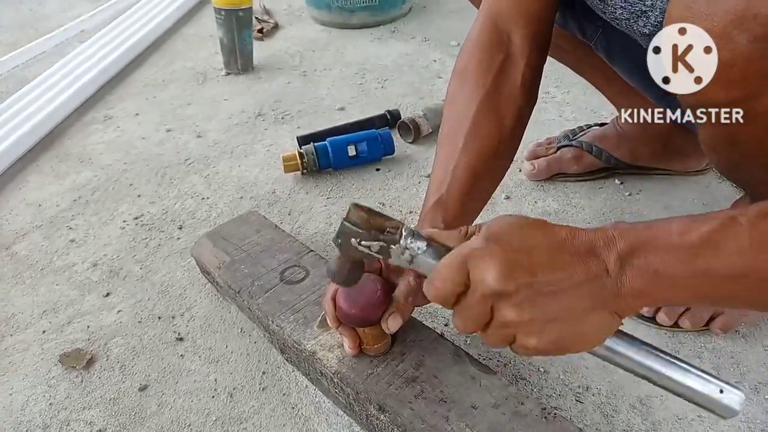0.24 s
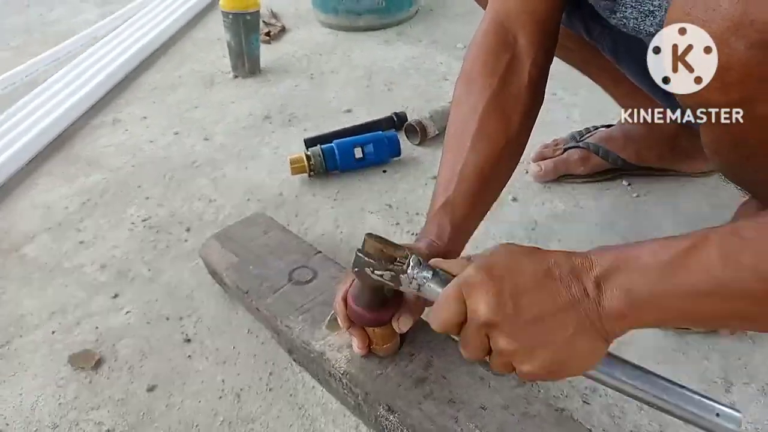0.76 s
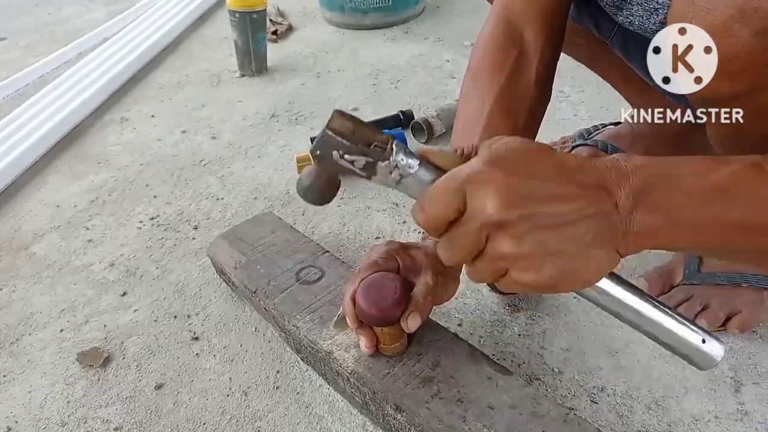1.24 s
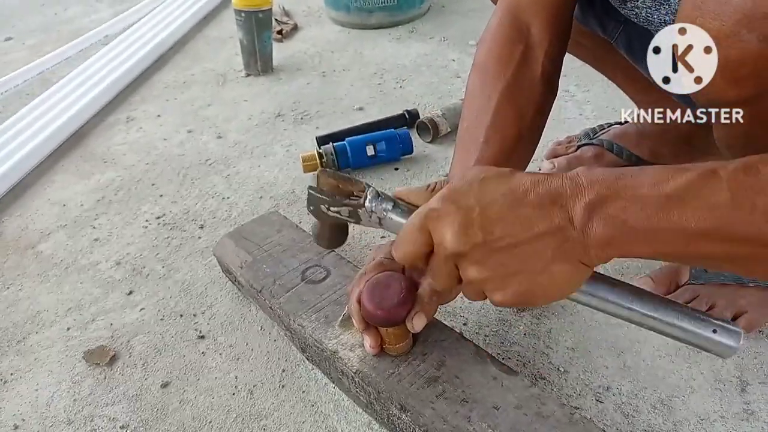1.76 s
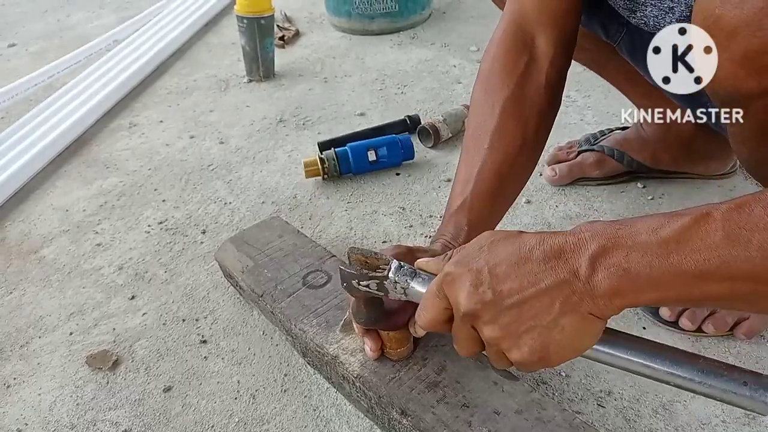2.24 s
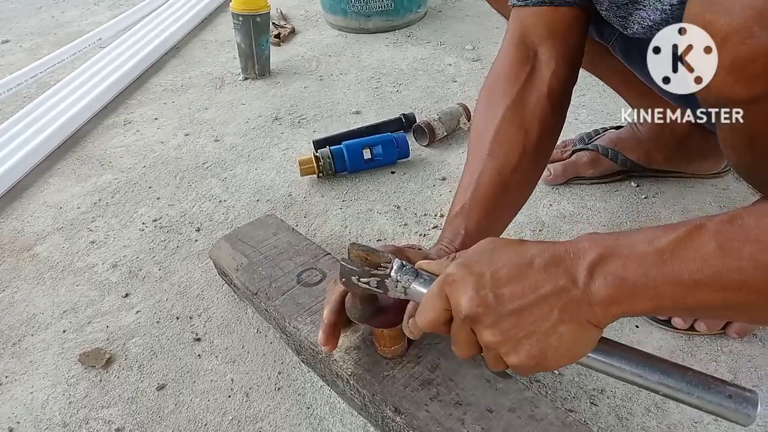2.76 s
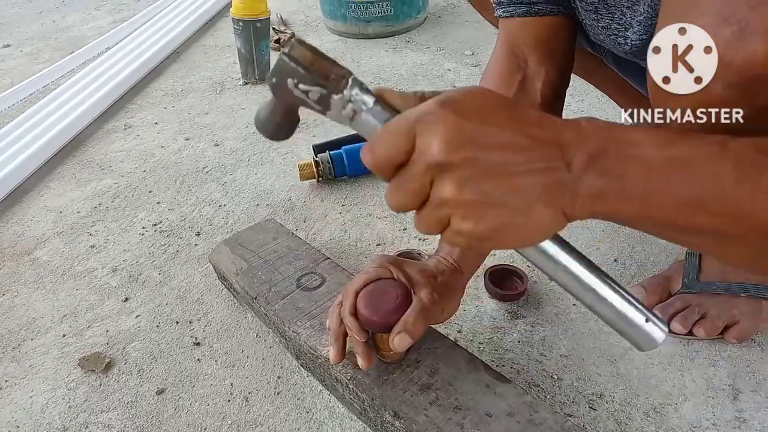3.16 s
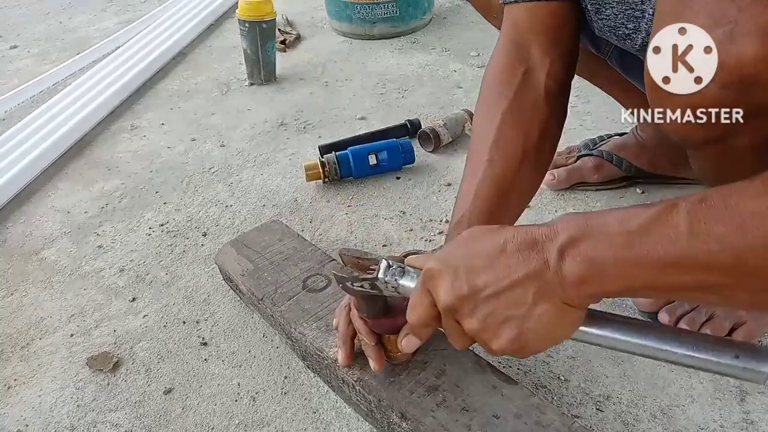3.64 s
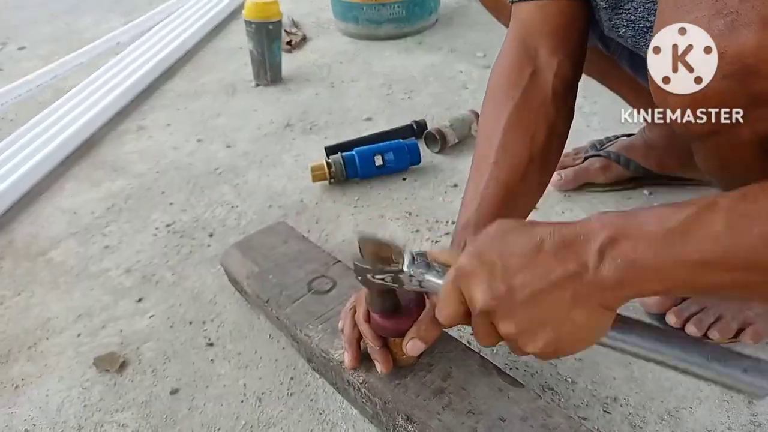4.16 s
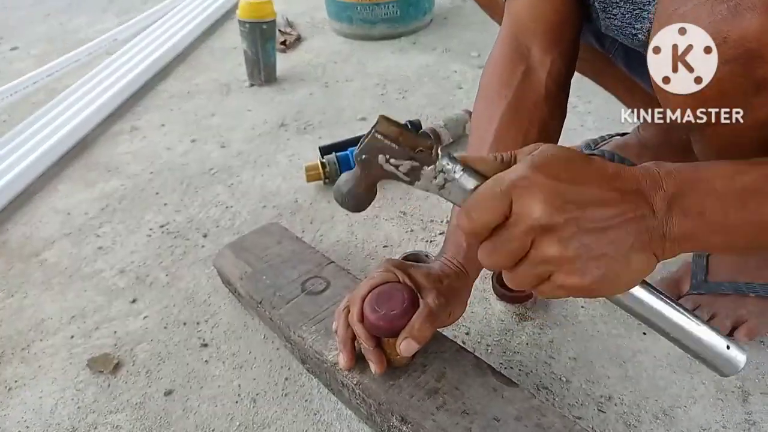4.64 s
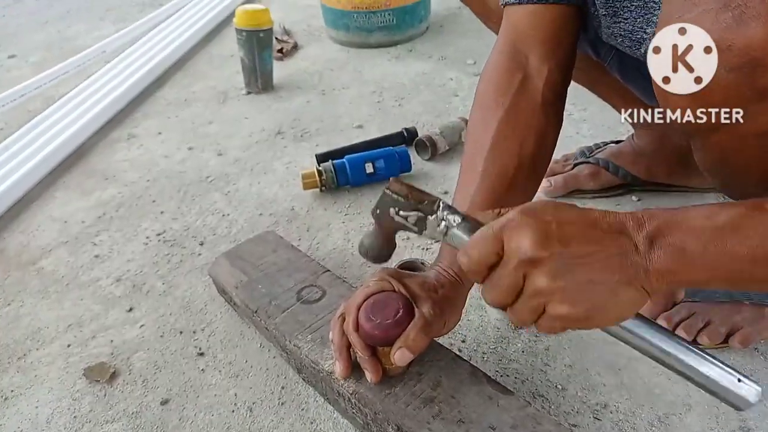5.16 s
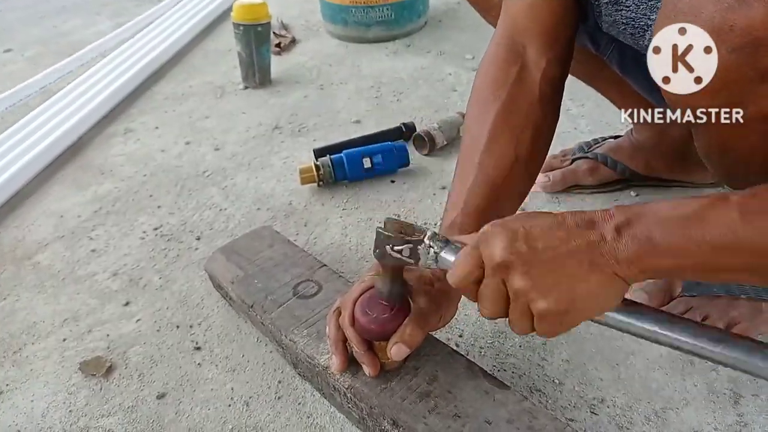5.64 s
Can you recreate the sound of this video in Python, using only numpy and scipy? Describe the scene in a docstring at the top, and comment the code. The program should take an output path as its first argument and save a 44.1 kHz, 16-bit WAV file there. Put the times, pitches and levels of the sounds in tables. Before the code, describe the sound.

A hammer hits a capped steel punch on a wooden block, about three sharp blows a second, each with a short metallic ring, a woody knock and a fluttering echo off yard walls. After eight blows it pauses, and metal clinks and jingles softly as the punch is turned. Nine more blows follow, varying in weight. The microphone is close and overloads slightly, over a faint outdoor rumble.

```python
"""Sharp hammer taps on a capped steel punch, driven through leather on a wooden block, ring in a hard yard.
Each impact excites the damped modes of steel and wood, and the walls reflect it as a fluttering echo.
Loose steel clinks between the blows, which pause while the fingers turn the punch; outdoor air rumbles.
The close microphone overloads on the blows, and the recorder's gain control ducks and swells back."""
import sys
import numpy as np
from scipy import signal
from scipy.fft import rfft, irfft, next_fast_len
from scipy.io import wavfile
from scipy.ndimage import uniform_filter1d, minimum_filter1d, map_coordinates

SR = 44100
rng = np.random.default_rng(int(sys.argv[2]) if len(sys.argv) > 2 else 0)


def store_wav(level_fs):
    """Save 16-bit WAV to argv[1]."""
    pcm = np.round(np.clip(np.atleast_2d(level_fs), -1, 1) * 32767)
    wavfile.write(sys.argv[1], SR, pcm.T.astype(np.int16))


N = 259749

# hammer blows: (time [s], weight carried through the punch into the block [dB])
BLOWS = [(0.0202, -12), (0.319, -9.5), (0.6302, -13), (0.921, -12.5), (1.226, -3), (1.5257, -3.5),
         (1.8255, -2.5), (2.1276, 0.5), (3.4494, 3), (3.772, -2.5), (4.0595, -3), (4.3447, -4), (4.628, -2),
         (4.9338, -13.5), (5.215, -13.5), (5.4853, -4), (5.7753, 0.5)]
# modes of hammer, cap and punch: (frequency [Hz], level [dB], nominal t60 [s])
PUNCH_MODES = [(832, -11, .03), (1066, -5, .032), (1270, -12, .022), (1480, -3, .025), (1660, -6, .027),
               (2110, 1, .029), (2290, -4, .027), (2550, -4, .024), (2850, -8, .02), (3150, -12, .018),
               (3660, -16, .02), (4800, -25, .015)]
# modes of the wooden block: (frequency [Hz], level [dB], t60 [s])
BLOCK_MODES = [(264.6, 1, 0.016), (431, 0, 0.012), (593, -5.5, 0.018)]
# reflections from the walls: (delay [s], level [dB])
WALL_ECHOES = [(.026, -16), (.041, -1), (.049, 0), (.069, -4), (.096, -1), (.116, -9), (.141, -9),
               (.15, -6), (.168, -16), (.193, -12), (.219, -20), (.24, -16)]
# reverberation time of the yard: (frequency [Hz], t60 [s])
YARD_T60 = [(200, .7), (1200, .8), (2600, .74), (5000, .5), (12000, .3)]
# modes of the loose steel: (frequency [Hz], level [dB], ring time [ratio])
STEEL_MODES = [(1480, 9, 1.03), (1940, 9, 0.47), (2494, 9.5, 0.76), (2705, 1, 1.21), (3030, -7.5, 1.17),
               (3534, -3, 0.75), (3887, -13, 1.94), (4753, -10, 1.77), (5460, -14, 0.84),
               (6320, -18.5, 2.1), (7700, -7, 1.3), (8020, -9.5, 1.84), (9400, -35, 0.67),
               (10430, -10, 0.85), (11470, -11, 1.4), (12100, -2, 0.94), (13760, -28, 1), (15100, -21, .8)]
# clear clinks: (time [s], level [dB], nominal t60 [s])
CLINKS = [(0.795, -14, 0.052), (1.035, -8.5, 0.052), (1.0524, -14, 0.042), (1.4892, -9.5, 0.02),
          (1.7265, -7, 0.024), (1.8787, -1.5, 0.026), (3.114, -19, 0.013), (3.4404, -11, 0.043),
          (3.628, -11, 0.04), (3.6731, -7.5, 0.054), (3.7675, -15, .04), (4.0545, -5, 0.038),
          (5.7387, -11.5, 0.058)]
# spells of jingling as the punch is shifted: (start [s], length [s], typical tick level [dB])
JINGLES = [(0.76, 0.14, -25), (1.36, 0.35, -26.5), (2.699, .48, -28.5)]
# the hammer resting on the cap: (time [s], level [dB], pitch [Hz], nominal t60 [s])
KNOCKS = [(2.609, -13.5, 2100, 0.029), (2.6657, -12, 3050, .031), (2.725, -2, 3950, 0.021),
          (2.811, -19, 1780, 0.023), (2.8414, -9, 3370, 0.039), (3.0073, -14.5, 2550, 0.041),
          (3.1617, -10.5, 2900, 0.067), (3.68, 4.5, 3420, 0.013)]
# rubs of hand, punch and leather: (start [s], length [s], level [dB])
RUBS = [(0.252, 0.043, -43.5), (0.734, 0.12, -43.5), (3.205, 0.25, -47.5), (3.678, 0.072, -43),
        (4.509, 0.051, -40)]
# noise spectra: (frequency [Hz], relative spectral density [dB])
CRACK_SPECTRUM = [(200, 2.5), (700, -8), (1100, 3.5), (2300, 5), (3200, 3.5), (4500, -18.5), (9000, -25),
                  (15000, -47)]  # hammer contact
YARD_SPECTRUM = [(150, -30), (300, -21), (620, -14.5), (790, 4), (1150, -7), (1350, 2.5), (1800, 1.5),
                 (2450, 3), (3200, -5), (4100, -15.5), (5400, -35.5), (8000, -30.5), (12000, -50)]  # early reflections and diffuse tail
FLUTTER_SPECTRUM = [(150, -52), (280, -14), (410, 1.5), (620, -14.5), (830, 1), (1350, 8), (1900, -3.5),
                    (2600, -15), (3600, -24.5), (5400, -46), (12000, -55)]  # wall echoes
GRIT_SPECTRUM = [(1500, -25), (3200, 9.5), (4000, 17.5), (4800, 9), (6200, -10.5), (8500, 13.5),
                 (11500, -2.5), (14000, 4), (16000, -1)]  # friction and small clicks
SHIFT_SPECTRUM = [(30, -28), (70, 2), (140, -4), (300, -30), (1000, -80)]  # the block shifting on the floor
AIR_SPECTRUM = [(25, -23), (45, -21), (75, 6), (140, 9.5), (230, 2), (400, 1.5), (700, 2.5), (1200, -1.5),
                (2800, -0.5), (4200, -12), (6000, -57), (9000, -71)]  # outdoor rumble
HISS_SPECTRUM = [(3000, 0), (6000, -10), (7000, -5), (8000, 7.5), (9200, -1.5), (10300, -10), (12000, -15),
                 (15500, -26)]  # thin background hiss


def hammer(contact_s=0.00085, grip_detune=0.022, grip_ring_share=0.83, bounce_s=0.0032):
    """Impact excitation: each blow rings the hand-damped punch, knocks the block and thumps the ground."""
    track, t = np.zeros(N), np.arange(SR // 8) / SR
    hz, mode_db, t60 = np.transpose(PUNCH_MODES)[:, :, None]
    wood = sum((-1) ** k * amp(db) * np.sin(2 * np.pi * f * t) * fade(t, life)
               for k, (f, db, life) in enumerate(BLOCK_MODES))
    # the thud sinks in pitch as the block settles
    sinking_hz = 60 + 70 * np.exp(-t / 0.012)
    thud = np.sin(2 * np.pi * np.cumsum(sinking_hz) / SR) * fade(t, 0.049)
    # struck on the same spot each time, the modes start alike
    start_phase = 2 * np.pi * rng.random(hz.shape)
    for s, weight_db in BLOWS:
        force_db, tilt_db_per_octave = strike(weight_db)
        level_db = mode_db + tilt_db_per_octave * np.log2(hz / 1600) + 2 * rng.standard_normal(hz.shape)
        gripped_hz = hz * (1 + grip_detune * rng.standard_normal(hz.shape))
        phase = 2 * np.pi * gripped_hz * t + start_phase + .5 * rng.standard_normal(hz.shape)
        ring = np.sum(amp(level_db) * np.sin(phase) * fade(t, grip_ring_share * t60, contact_s), axis=0)
        crack = noise(CRACK_SPECTRUM, len(t)) * fade(t, .028, contact_s)
        steel = amp(force_db) * (amp(8) * ring + crack)
        ground = amp(-9 + 1.8 * weight_db) * thud  # joins in only under heavy blows
        add(track, s, steel + amp(2 + weight_db) * wood - ground)
        # the concrete floor throws the crack straight back
        add(track, s + bounce_s, amp(force_db - 1) * noise(CRACK_SPECTRUM, len(t)) * fade(t, .02))
    return track


def strike(weight_db):
    """Contact force: a square, heavy blow is a little louder [dB] and duller [dB per octave]."""
    return -4 + 0.087 * weight_db, -2 - 0.04 * weight_db


def yard_echoes(recolour=0.053):
    """Multiple reflection: the walls return each blow as a slap, then flutter over a diffuse tail."""
    t = np.arange(SR) / SR
    hz, frame_s, bands = signal.stft(noise(YARD_SPECTRUM, SR), SR, nperseg=256)
    tail = signal.istft(bands * fade(frame_s, along(YARD_T60, hz)[:, None]), SR, nperseg=256)[1][:SR]
    response = amp(-18) * noise(YARD_SPECTRUM, SR) * fade(t - .008, .4, .004)  # weak near reflections
    # the nearest large wall returns a bright slap, and the tail follows it
    slap = amp(1) * noise(YARD_SPECTRUM, SR) * fade(t, .07, .001)
    add(response, .0422, slap + amp(-7) * tail)
    # rough walls smear and dull the later echoes
    flutter = np.sqrt(sum((amp(db) * fade(t - delay, .045, .003)) ** 2 for delay, db in WALL_ECHOES))
    response += amp(3) * flutter * noise(FLUTTER_SPECTRUM, SR)
    track = np.zeros(N)
    for s, weight_db in BLOWS:
        force_db, tilt_db_per_octave = strike(weight_db)
        # every contact has a slightly different shape, which recolours the echo
        contact = recolour * rng.standard_normal(256) * fade(t[:256], .03)
        contact[0] = 1
        tilt = lambda f: amp(.5 * tilt_db_per_octave * np.log2(np.clip(f, 700, 3000) / 1600))
        add(track, s, amp(force_db - 4.5) * filtered(signal.fftconvolve(response, contact), tilt))
    return track


def clinks(pitch_hz=4000, rattles_per_s=4, rattle_t60=0.063, jingles_per_s=22, jingle_t60=0.076):
    """Light collisions: loose steel clinks, jingles as the punch shifts and rattles as the hands move."""
    events = [(s, db, pitch_hz, t60) for s, db, t60 in CLINKS]
    spells = [(0.0021, N / SR, -32.5, rattles_per_s, rattle_t60)]  # faint rattling throughout
    spells += [(*spell, jingles_per_s, jingle_t60) for spell in JINGLES]
    for s, length, db, rate, t60 in spells:
        for _ in range(round(rate * length)):
            events.append((s + length * rng.random(), rng.normal(db, 0.5), pitch_hz, t60))
    return amp(1) * small_steel(events, width_octaves=0.81, click_db=-7, attack_s=0.001)


def knocks():
    """Soft contact: the hammer head settles on the cap and excites a narrow band of modes."""
    return amp(-3) * small_steel(KNOCKS, width_octaves=0.35, click_db=-5.5, attack_s=0.0017)


def small_steel(events, width_octaves, click_db, attack_s):
    """Resonance: a light contact rings the steel modes nearest its own pitch, over a short click."""
    track, t = np.zeros(N), np.arange(SR // 4) / SR
    hz, mode_db, ring_time = np.transpose(STEEL_MODES)[:, :, None]
    for s, db, pitch_hz, t60 in events:
        focus = lambda f: 1 / (1 + (np.log2((f + 1) / pitch_hz) / width_octaves) ** 2)
        # the shifting grip changes each mode's strength, tuning and damping
        strength_db, detune, damping = rng.normal(0, [3.5, .012, .3], (len(hz), 3)).T[:, :, None]
        gains = amp(mode_db + strength_db) * focus(hz)
        phase = 2 * np.pi * (hz * t * (1 + detune) + rng.random(hz.shape))
        decay = fade(t, t60 * ring_time * np.exp(-damping), attack_s)
        ring = np.sum(gains * np.sin(phase) * decay, axis=0) / np.linalg.norm(gains)
        click = unit(filtered(noise(GRIT_SPECTRUM, len(t)), focus)) * fade(t, .025, attack_s)
        add(track, s, amp(db) * (ring + amp(click_db) * click))
    return track


def rubs(slips_per_s=350, turn_start_s=2.4, turn_length_s=0.91):
    """Stick-slip friction: grit under the hand rings the steel faintly, and the shifting block rumbles."""
    strokes, t = np.zeros(N), np.arange(SR // 12) / SR
    turn = (turn_start_s, turn_length_s, -63.5)  # the fingers rustle as they turn the punch
    for s, length, db in RUBS + [turn]:
        add(strokes, s, amp(db) * signal.windows.tukey(int(length * SR), .5))
    slips = (rng.random(N) < slips_per_s / SR) * rng.standard_normal(N)
    ring = np.zeros(len(t))
    for hz, _, ring_time in STEEL_MODES:
        mode = np.sin(2 * np.pi * (hz * t + rng.random())) * fade(t, 0.015 * ring_time)
        ring += amp(along(GRIT_SPECTRUM, hz)) * mode
    grit = unit(signal.fftconvolve(slips, ring)[:N]) + amp(-6) * noise(GRIT_SPECTRUM, N)
    catches = unit(amp(3 * wobble(90)))
    return strokes * (catches * grit + amp(-3) * noise(SHIFT_SPECTRUM, N))


def background(air_db=-44, hiss_db=-59):
    """Ambient noise: a gently swaying rumble of outdoor air lies under a thin steady hiss."""
    sway = amp(1.2 * wobble(7))
    return amp(air_db) * sway * noise(AIR_SPECTRUM, N) + amp(hiss_db) * noise(HISS_SPECTRUM, N)


def amp(db):
    """Decibels to amplitude ratio."""
    return 10 ** (np.asarray(db) / 20)


def unit(x):
    """Normalisation to rms 1."""
    return x / np.sqrt(np.mean(x ** 2) + 1e-20)


def along(points, hz):
    """Interpolation of (frequency [Hz], value) points on a log frequency axis."""
    f, values = np.transpose(points)
    return np.interp(np.log(hz + 1), np.log(f), values)


def filtered(x, response):
    """Linear filtering: the spectrum of x times a frequency response."""
    size = next_fast_len(len(x) + 8192)
    return irfft(rfft(x, size) * response(np.fft.rfftfreq(size, 1 / SR)), size)[:len(x)]


def noise(spectrum, size):
    """Spectral shaping: coloured noise of rms 1."""
    return unit(filtered(rng.standard_normal(size), lambda hz: amp(along(spectrum, hz))))


def wobble(knots_per_s):
    """Random modulation: a smooth curve through Gaussian knots."""
    knots = rng.standard_normal(int(N * knots_per_s / SR) + 4)
    return map_coordinates(knots, [np.arange(N) * knots_per_s / SR])


def fade(t, t60, attack_s=0.00031):
    """Exponential damping: a rounded onset at time zero, then a decay by 60 dB in t60."""
    t = np.maximum(t, 0)
    return (1 - np.exp(-(t / attack_s) ** 2)) * np.exp(-np.log(1000) * t / t60)


def add(track, s, sound):
    """Superpose a sound on the track at time s."""
    start = max(round(s * SR), 0)
    track[start:start + len(sound)] += sound[:max(len(track) - start, 0)]


def scene():
    """Superposition: blows, echoes, handling sounds and background sum at one microphone."""
    return (amp(14) * hammer() + yard_echoes() + knocks() + rubs() + background() + clinks())[None]


def gain_control(x, ceiling=.92, ahead_s=0.041, hold_s=0.038, release_db_per_s=115):
    """Look-ahead limiting: the gain sinks just before a peak, holds, then climbs back steadily."""
    ahead, hold = int(ahead_s * SR), int(hold_s * SR)
    span = ahead + hold
    need_db = np.minimum(20 * np.log10(ceiling / (np.abs(x) + 1e-9)), 0)
    held_db = minimum_filter1d(np.pad(need_db, (ahead, 0)), span, origin=(span - 1) // 2)[ahead:]
    climb_db = release_db_per_s * np.arange(N) / SR
    gain_db = np.pad(climb_db + np.minimum.accumulate(held_db - climb_db), (0, ahead), mode="edge")
    smooth_db = uniform_filter1d(gain_db, ahead, origin=(ahead - 1) // 2)[ahead:]
    return x * amp(smooth_db)


def record(dry, overload_db=12, hardness=5, low_hz=35, top_hz=15800):
    """Saturation: the microphone flattens the peaks; gain control and band limiting follow."""
    clipped = dry[0] / (1 + np.abs(dry[0] / amp(overload_db)) ** hardness) ** (1 / hardness)
    band = lambda hz: hz ** 2 / (hz ** 2 + low_hz ** 2) / np.sqrt(1 + (hz / top_hz) ** 120)
    return filtered(gain_control(clipped), band)[None]


dry = scene()
out = record(dry)
store_wav(out)
```